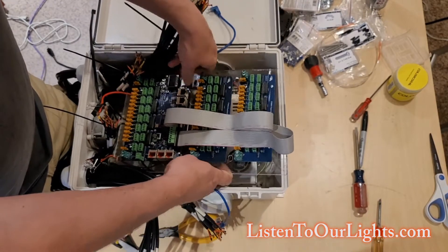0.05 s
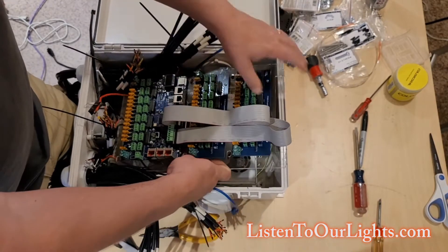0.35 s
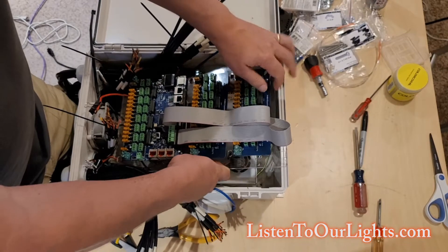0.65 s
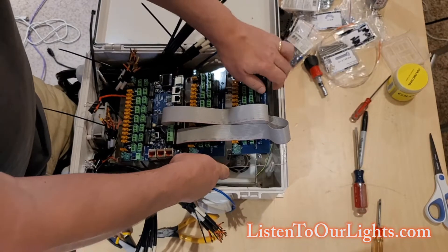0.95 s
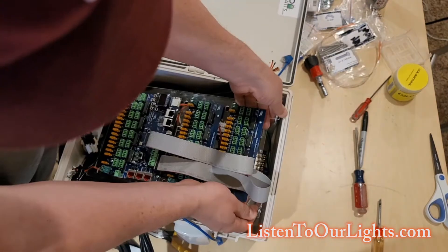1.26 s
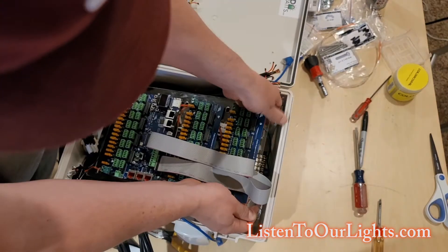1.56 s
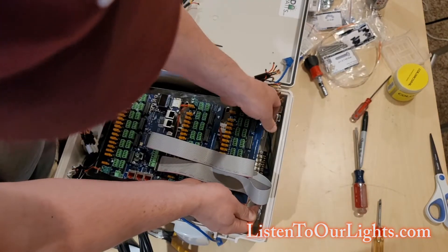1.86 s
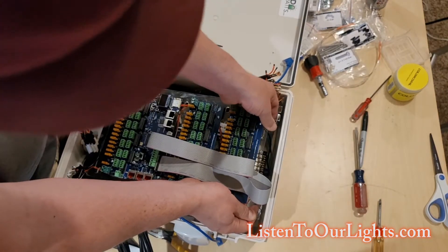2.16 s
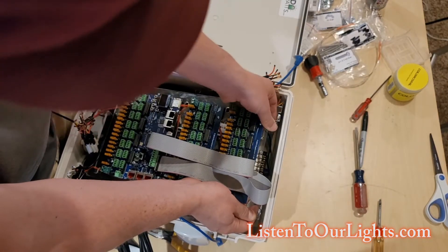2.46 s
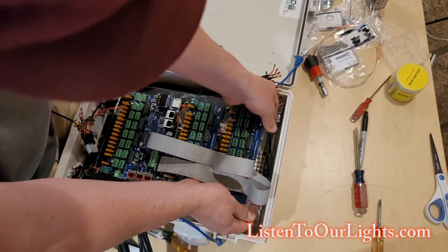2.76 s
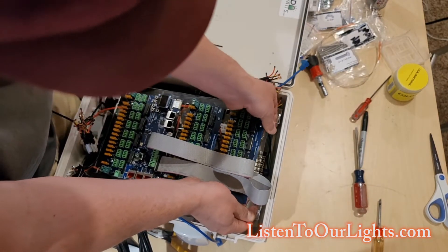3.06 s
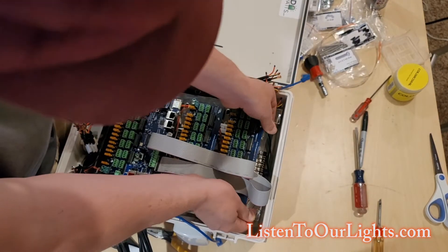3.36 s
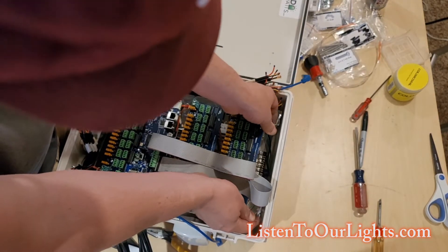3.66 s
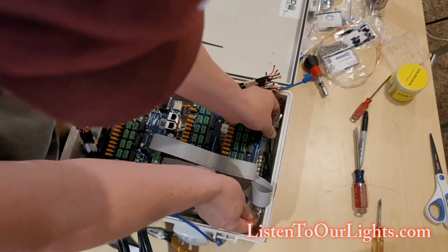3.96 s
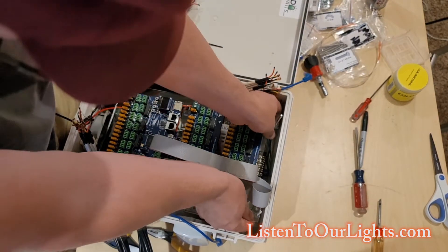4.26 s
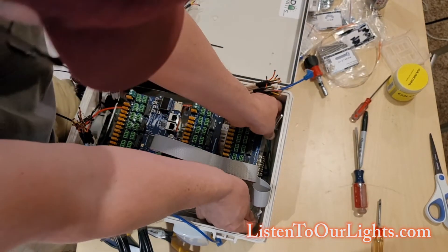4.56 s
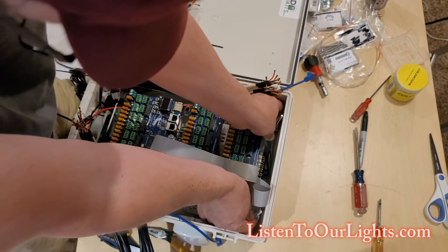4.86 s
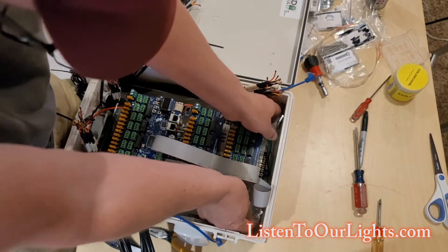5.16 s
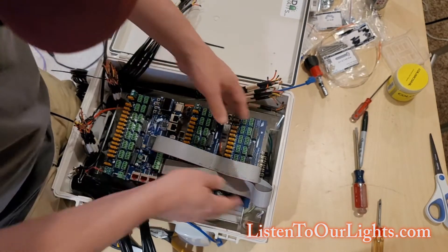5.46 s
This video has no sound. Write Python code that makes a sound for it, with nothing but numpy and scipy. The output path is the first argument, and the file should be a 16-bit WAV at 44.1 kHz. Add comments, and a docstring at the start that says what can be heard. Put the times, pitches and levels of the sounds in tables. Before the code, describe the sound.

Wires rustle softly and fingers tap on a plastic box in a small room. A circuit panel drops onto the rim with a brief rattling clack, followed by a few taps and tiny squeaks. Then it snaps past the rim and judders down the wall in loud, uneven cracks with a gritty scrape, gradually weakening. A knock and light rustling finish, all heard close over a faint low room rumble.

```python
"""Pressing a panel into a plastic box

Hands press a circuit panel into a plastic electronics box on a wooden bench in a small room.
Wires rustle, fingers tap and squeak, and the panel clacks onto the rim. Then it snaps past the rim
and judders down the wall, sticking and slipping, with a gritty scrape between the jerks."""
import sys
import numpy as np
from scipy import signal
from scipy.fft import rfft, irfft
from scipy.io import wavfile
from scipy.ndimage import uniform_filter1d

SR = 44100
rng = np.random.default_rng(int(sys.argv[2]) if len(sys.argv) > 2 else 0)


def generate_wav(signal):
    """Clip the signal to [-1, 1] and save it as 16-bit WAV at the path in sys.argv[1]."""
    frames = np.transpose(np.atleast_2d(signal))
    scaled = np.clip(frames, -1, 1) * 32767
    pcm = np.round(scaled).astype(np.int16)
    wavfile.write(sys.argv[1], SR, pcm)


N = 243411
TIME = np.arange(N) / SR
SHORT, BRIEF = TIME[:SR // 2], TIME[:4096]  # clocks for single sounds [s]
SIDES = np.array([[1], [-1]])  # left, right

# pitches at which the panel rings: (pitch [Hz], width [Hz], boost [dB])
PANEL_PEAKS = [(1110, 60, 5), (1510, 70, 4), (1810, 70, 8), (2130, 80, 3), (2730, 70, 4), (3400, 130, 4)]


def judder(slowing=1.2, growth_db=0.5, uneven_s=.0004, uneven_db=1):
    """Each push makes the panel stick and slip in jerks that come ever further apart."""
    # pushes on the panel: (start [s], first gap [s], jerks [count], crack [dB], thump [dB])
    pushes = [(2.9035, .005, 1, -16, -25), (2.908, .005, 1, -9.5, -22.5), (3.047, .023, 2, -32, -28.5),
              (3.238, .011, 2, -29.5, -28), (3.323, .019, 3, -33.5, -28), (3.38, .005, 1, -5, -17),
              (3.4134, .019, 3, -11.5, -24), (3.4742, .024, 2, -10.5, -22), (3.618, .011, 1, -7.5, -17.5),
              (3.6402, .0145, 3, -14, -24.5), (3.7009, .009, 3, -16.5, -26.5), (3.74, .015, 1, -11, -25.5),
              (3.772, .015, 2, -19, -27), (3.811, .017, 1, -14.5, -23), (3.8461, .017, 1, -13, -19.5),
              (3.9095, .022, 2, -13, -23), (3.973, .015, 1, -13.5, -24.5), (4.027, .0225, 3, -16, -23),
              (4.1758, .029, 2, -18.5, -22.5), (4.234, .018, 3, -18.5, -30), (4.328, .019, 1, -26, -29),
              (4.3645, .025, 2, -23, -27), (4.466, .02, 1, -25, -28), (4.502, .026, 2, -24, -28.5),
              (4.567, .031, 2, -26, -31)]
    jerks = []  # (time [s], crack [dB], thump [dB], scrape [dB])
    for s, gap, count, crack, thump in pushes:
        scrape = (crack + thump) / 2 - 8
        for k in range(round(count)):
            late, harder = rng.standard_normal(2) * [uneven_s, uneven_db]
            jerks.append((s + late * (k > 0), crack + harder, thump + harder + k * growth_db, scrape))
            s += gap * slowing ** k
    return jerks


def panel_slips(jerks, detune=0.0093, left_db=6.5):
    """Each jerk cracks at the edge, makes the panel sing briefly and shoves the box so it rings."""
    # the panel's note as it sinks in: (time [s], pitch [Hz], rise [s], level over the thump [dB])
    note_by_depth = [(2.905, 613, 0.0018, 9.5), (2.909, 375, 0.0036, 4), (2.95, 665, .0032, 6.5),
                     (3.381, 656, 0.0052, -7.5), (3.414, 726, 0.0042, 8), (3.5, 738, .0033, 7),
                     (3.62, 589, 0.0013, -2), (4.25, 448, 0.004, -2.5)]
    # tone of a crack: (frequency [Hz], level [dB])
    crack_tone = [(200, -26), (600, 10), (1000, -3), (1400, -2), (2100, 6), (3100, 1.5), (3700, -2.5),
                  (4700, -1.5), (6300, -8), (7500, -14.5), (11500, -28), (16000, -41)]
    cracks, shoves, notes = np.zeros((2, N)), np.zeros(N), np.zeros((2, N))
    when, *columns = np.transpose(note_by_depth)
    for s, crack_db, thump_db, _ in jerks:
        hz, rise_s, sing_db = (np.interp(s, when, column) for column in columns)
        hz *= np.exp(detune * rng.standard_normal())
        crack = through(tear(rise_s=rng.uniform(.0009, .0016)), colour(crack_tone, PANEL_PEAKS))
        add(cracks, s, from_db(crack_db + 14.5) * through(crack, walls(t60=0.092, scatter_db=2.5)))
        add(shoves, s, from_db(thump_db + 8) * ring(hz, cycles=0.99))
        note = swell(rise_s) * np.sin(2 * np.pi * hz * SHORT + SIDES * 0.5)
        add(notes, s, from_db(thump_db + sing_db) * note)
    return cracks + notes * from_db(SIDES * left_db / 2) + through(shoves, box_ring())


def panel_scrape(jerks, inside_s=3.6):
    """The panel drags over grit, faster after each jerk, and shakes the bench once it is inside."""
    # the drag beneath the jerks: (time [s], level [dB])
    drag = [(3.6, -42), (3.63, -27), (3.76, -29), (4.0, -38), (4.07, -30), (4.13, -50.5), (4.23, -23),
            (4.43, -59), (4.55, -35.5), (4.65, -47), (4.72, -71)]
    # tone of the grit: (frequency [Hz], level [dB])
    grit_tone = [(120, -4), (400, 7.5), (750, -0.5), (1000, -8), (1900, -5), (3200, -10), (5000, -23),
                 (7500, -24.5), (12000, -24), (16000, -34)]
    power = from_db(np.interp(TIME, *np.transpose(drag), left=-np.inf, right=-np.inf)) ** 2
    for s, _, _, scrape_db in jerks:
        add(power, s, (from_db(scrape_db) * swell(rise_s=0.0085)) ** 2)
    catches = np.sqrt(power) * grains(per_s=1700, spread_db=3.2, clump_db=1.5)
    scrape = through(catches, colour(grit_tone, PANEL_PEAKS))
    bench_rumble = from_db(6) * filtered(catches * (TIME > inside_s), [85, 230], "band")
    return through(scrape, walls(t60=0.079, scatter_db=-1)) + bench_rumble


def panel_knock():
    """The panel drops on the rim and rattles to rest: dry clacks over a thud the hands muffle."""
    # hits on the rim: (time [s], clack [dB], thud [dB])
    knocks = [(1.471, -26, -44), (1.474, -21.5, -27), (1.4815, -22, -47), (1.4865, -27.5, -25.5),
              (1.497, -32, -32), (1.545, -41, -44), (1.585, -41, -54)]
    # tone of the clacks: (frequency [Hz], level [dB])
    rim_tone = [(150, -1), (1000, -3.5), (2000, 1.5), (4700, -10), (8000, -22.5), (16000, -34)]
    clacks, thuds = np.zeros((2, N)), np.zeros(N)
    for s, clack_db, thud_db in knocks:
        clack = through(tear(rise_s=.001), walls(t60=0.079, scatter_db=3))
        add(clacks, s, from_db(clack_db + 17) * clack)
        add(thuds, s, from_db(thud_db + 15) * ring(hz=460, cycles=9.5))
    return through(clacks, colour(rim_tone)) + thuds + from_db(-16) * through(thuds, box_ring())


def edge_zings(hz=8520, spread_hz=80, gap_s=.015):
    """Deep in the box the panel's edge catches and sings thinly, never at quite the same pitch."""
    # quick runs of chirps: (start [s], chirps [count], level [dB])
    runs = [(3.622, 5, -44), (3.735, 4, -46), (4.212, 1, -44), (4.278, 2, -45), (4.374, 3, -46),
            (4.477, 5, -46.5), (4.576, 2, -50), (4.648, 1, -52)]
    out = np.zeros((2, N))
    for s, count, db in runs:
        for k in range(round(count)):
            off_pitch, harder, left_lead = rng.standard_normal(3)
            tone = np.sin(2 * np.pi * (hz + spread_hz * off_pitch) * SHORT + SIDES * left_lead / 2)
            add(out, s + k * gap_s, from_db(db + 4 + harder) * swell(rise_s=.0021) * tone)
    return out


def finger_taps(ring_s=0.044):
    """A light touch gives a clack, a tick, a short ring of the part hit and a dull thump of the box."""
    # fingers and wire ends hitting the box: (time [s], tap [dB], pitch [Hz], thump [dB], tick [dB])
    taps = [(.161, -42, 3000, -73, -57), (.178, -26.5, 2430, -48, -49), (.249, -32, 900, -53, -50.5),
            (0.3, -25.5, 1737, -52, -56), (0.4538, -57, 2660, -55, -58.5), (.511, -57, 5500, -62, -62.5),
            (0.656, -53, 1810, -59, -59.5), (.762, -43, 1540, -48, -38.5), (.836, -33, 2610, -56.5, -71),
            (1.15, -55, 7100, -70, -70), (1.892, -47, 760, -54.5, -61), (2.202, -34.5, 940, -50.5, -83),
            (2.616, -39, 1990, -48, -67), (4.812, -29, 1186, -42, -64.5), (4.903, -44.5, 569, -52, -79),
            (5.095, -62.5, 2000, -53, -56), (5.283, -44, 1840, -59, -61), (5.436, -46, 1900, -55, -61)]
    # tone of a clack: (frequency [times the tap's pitch], level [dB])
    clack_tone = [(.15, -13.5), (.5, 2), (1, 10), (1.6, 1), (3.3, -20), (8, -48.5)]
    # tone of a tick: (frequency [Hz], level [dB])
    tick_tone = [(400, 6), (1000, 2.5), (1550, 9), (2250, 10), (3150, 5.5), (4600, -2), (6500, -4),
                 (8500, -11.5), (11500, -8), (16000, -32)]
    bright, shoves = np.zeros((2, N)), np.zeros(N)
    for s, tap_db, hz, thump_db, tick_db in taps:
        snap = unit_energy(spray(t60=0.055)[0] + 0.47 * (BRIEF == 0))  # a click, then dying noise
        contact = through(snap, walls(t60=0.033, scatter_db=0.5))
        clack = through(contact, colour([(hz * multiple, db) for multiple, db in clack_tone]))
        add(bright, s, from_db(tap_db + 17) * clack)
        add(bright, s, from_db(tick_db + 28) * through(contact, colour(tick_tone)))
        add(bright, s, from_db(tap_db + 6.5) * ring(hz, cycles=hz * ring_s))
        add(shoves, s, from_db(thump_db + 12.5) * ring(hz=465, cycles=3.5))
    return bright + through(shoves, box_ring())


def squeaks(sag=0.11, sag_s=0.014, left_db=8):
    """A finger or the panel creeps over plastic and squeaks, its pitch sagging as the strain lets go."""
    # brief rubs: (time [s], pitch it sags to [Hz], rise [s], level [dB])
    rubs = [(.482, 414, 0.018, -40), (2.162, 477, 0.0023, -41.5), (2.687, 613, 0.0038, -35.5),
            (2.854, 706, 0.0056, -40), (5.268, 567, 0.0084, -42)]
    out = np.zeros(N)
    for s, hz, rise_s, db in rubs:
        pitch = hz * (1 + sag * np.exp(-SHORT / sag_s))
        tone = np.sin(2 * np.pi * np.cumsum(pitch) / SR)
        rasp = rms_one(filtered(rng.standard_normal(len(SHORT)), [400, 2200], "band"))
        add(out, s, from_db(db) * swell(rise_s) * (tone + from_db(-25) * rasp))
    return out * from_db(SIDES * left_db / 2)


def wire_rustle():
    """Skin and wires slide over plastic: a dull grainy rub that stirs the box, under a fine hiss."""
    # strokes of hands and wires: (start [s], rise [s], rub [dB], hiss [dB])
    strokes = [(0, 0.047, -52, -65), (0.154, 0.013, -50, -57), (0.248, 0.011, -41.5, -62),
               (0.449, 0.029, -53.5, -57), (0.647, 0.013, -48.5, -52.5), (.72, 0.019, -52, -53.5),
               (1.08, 0.069, -57.5, -69.5), (2.326, 0.023, -51, -66), (4.661, 0.032, -55, -84),
               (5.098, 0.064, -52, -60), (5.189, 0.043, -54, -57), (5.27, 0.036, -61, -61)]
    # tones of the rub and the hiss: (frequency [Hz], level [dB])
    rub_tone = [(150, -16), (300, 1.5), (440, 10), (700, 4), (1100, -10.5), (2200, -10.5), (4000, -26.5),
                (8000, -51)]
    hiss_tone = [(1500, 12.5), (4000, 6), (7000, -0.5), (11000, -9.5), (16000, -31)]
    start, rise, rub_db, hiss_db = np.transpose(strokes)
    progress = np.maximum(TIME[:, None] - start, 0) / rise
    speed = progress * np.exp(1 - progress)  # each stroke sets off briskly and slows to a stop
    rub = speed @ from_db(rub_db) * grains(per_s=1800, spread_db=2, clump_db=2)
    hiss = speed @ from_db(hiss_db) * grains(per_s=1100, spread_db=5, clump_db=3)
    rustle = through(rub, colour(rub_tone)) + through(hiss, colour(hiss_tone))
    scattered = through(rustle, walls(t60=0.013, scatter_db=0.5)) * from_db(SIDES * 0.76)
    return scattered + from_db(-13) * through(rub, box_ring())


def box_ring(left_lead_rad=0.27):
    """A shove sets the box and bench ringing with several low notes, a little early on the left."""
    # notes of the box and bench: (pitch [Hz], level [dB], fade time [s], left over right [dB])
    box_notes = [(130, -24, .29, -3), (180.4, -19.5, 0.51, 0.5), (211.4, -20, 0.42, 1.5),
                 (352.6, -2, .1, -7.5), (416.3, 1, 0.12, 5), (481, -2.5, 0.078, 3), (632.5, -7.5, .14, 9.5),
                 (719, -5.5, 0.25, 12), (755.7, -6.5, .13, 14)]
    out = 0
    for hz, db, t60, left_db in box_notes:
        tone = np.cos(2 * np.pi * hz * SHORT + SIDES * left_lead_rad / 2)
        out += from_db(db + SIDES * left_db / 2) * tone * fade(t60)
    return out / np.sqrt(SR / 100)


def walls(t60, scatter_db):
    """The direct sound, a sample earlier on the left, plus the short ring of the plastic walls."""
    direct = np.array([BRIEF == 0, BRIEF == BRIEF[1]])
    scatter = filtered(spray(t60, channels=2), 280, "high")
    return unit_energy(direct + from_db(scatter_db) * scatter)


def room(x, echo_db, build_s):
    """Add the room's wash of echoes, which builds up quickly and lasts longest in the bass."""
    # how long the room rings: (frequency [Hz], fade time [s])
    fade_times = [(150, 0.94), (400, 0.33), (1000, 0.24), (3000, 0.3), (7000, 0.33), (14000, 0.16)]
    edges = np.geomspace(60, 16000, 9)
    build_up = 1 - np.exp(-(SHORT / build_s) ** 2)
    tail = 0
    for low, high in zip(edges, edges[1:]):
        band = filtered(rng.standard_normal((2, len(SHORT))), [low, high], "band")
        band *= fade(at_hz(fade_times, np.sqrt(low * high))) * build_up
        if high < 250:
            band = band[[0, 0]]  # long waves reach both ears alike
        tail += unit_energy(band) * np.sqrt(2 * (high - low) / SR)
    return x + from_db(echo_db) * through(x, tail)


def room_air(level_db=-55):
    """The room's steady low rumble, alike in both ears in the bass."""
    # tone of the air: (frequency [Hz], level [dB])
    air_tone = [(20, -13), (65, 2.5), (172, -10.5), (434, -17.5), (738, -20.5), (1050, -26.5), (2460, -31),
                (3250, -33), (8650, -51), (11400, -50.5), (16000, -58.5)]
    # how alike left and right are: (frequency [Hz], likeness [0 to 1])
    likeness = [(140, .98), (300, .75), (1000, .3)]
    hz = np.fft.rfftfreq(N, 1 / SR)
    common, opposite = rfft(rng.standard_normal((2, N)))
    alike = at_hz(likeness, hz)
    spectrum = np.sqrt(1 + alike) * common + SIDES * np.sqrt(1 - alike) * opposite
    air = irfft(from_db(at_hz(air_tone, hz)) * spectrum, N)
    return from_db(level_db) * rms_one(filtered(air, 7000, "low", order=1))


def tear(rise_s):
    """Tiny contacts give way, building up to one sharp break, then die out."""
    burst = unit_energy(spray(t60=.06)[0] * swell(rise_s)[:len(BRIEF)])
    sharp_break = np.arange(len(BRIEF)) == round(rise_s * SR)
    return unit_energy(burst + .7 * sharp_break)


def grains(per_s, spread_db, clump_db):
    """Sliding surfaces catch at random: tiny clicks of uneven size, louder in clumps."""
    clumps = rms_one(uniform_filter1d(rng.standard_normal(N), size=700))
    sizes = from_db(spread_db * np.minimum(rng.exponential(1, N), 4) + clump_db * clumps)
    return rms_one((rng.random(N) < per_s / SR) * sizes * rng.choice([-1, 1], N))


def spray(t60, channels=1):
    """Dying noise, evened out so that no pitch stands out."""
    noise = rng.standard_normal((channels, len(BRIEF))) * fade(t60)[:len(BRIEF)]
    for _ in range(2):
        spectrum = rfft(noise)
        noise = irfft(spectrum / (np.abs(spectrum) + 1e-12)) * fade(t60 * 4)[:len(BRIEF)]
    return unit_energy(noise)


def ring(hz, cycles):
    """A pure tone that dies within so many cycles."""
    return unit_energy(np.sin(2 * np.pi * hz * SHORT) * fade(cycles / hz))


def swell(rise_s):
    """A push that peaks after rise_s and is then stopped by friction."""
    progress = SHORT / rise_s
    return progress * np.exp(1 - progress)


def fade(t60):
    """A fade that drops 60 dB in t60 seconds."""
    return from_db(-60 * SHORT / t60)


def colour(points, peaks=(), size=4096):
    """A filter's response to a click, built from a tone table and any ringing peaks."""
    hz = np.fft.rfftfreq(size, 1 / SR)
    boost_db = sum(top / (1 + (2 * (hz - f) / width) ** 2) for f, width, top in peaks)
    cepstrum = irfft(np.log(from_db(at_hz(points, hz) + boost_db)))
    lag = np.arange(size)
    one_sided = (1 + np.sign(size // 2 - lag)) * (lag > 0)  # so nothing sounds before the click
    return unit_energy(irfft(np.exp(rfft(cepstrum * one_sided))))


def through(x, response):
    """Pass a sound through something, given its response to a click."""
    return signal.fftconvolve(np.atleast_2d(x), np.atleast_2d(response), axes=-1)[:, :N]


def filtered(x, hz, keep, order=2):
    """Keep the low part, the high part or one band of a sound."""
    return signal.sosfilt(signal.butter(order, hz, keep, fs=SR, output="sos"), x)


def add(track, s, sound):
    """Mix a sound in at s seconds."""
    i = round(s * SR)
    track[..., i:i + sound.shape[-1]] += sound[..., :N - i]


def at_hz(points, hz):
    """Read between a table's rows, with octaves evenly spaced."""
    f, value = np.transpose(points)
    return np.interp(np.log(np.maximum(hz, 1)), np.log(f), value)


def from_db(db):
    """Turn decibels into a multiplier."""
    return 10 ** (np.asarray(db) / 20)


def unit_energy(x):
    """Scale each channel to an energy of one."""
    return x / np.sqrt(np.sum(x ** 2, axis=-1, keepdims=True) + 1e-20)


def rms_one(x):
    """Scale to an average power of one."""
    return x / np.sqrt(np.mean(x ** 2) + 1e-20)


def scene():
    """Panel and hands echo in the room, over its steady rumble."""
    jerks = judder()
    panel = panel_knock() + panel_slips(jerks) + panel_scrape(jerks) + edge_zings()
    panel = room(panel, echo_db=-7, build_s=0.0044)
    hands = room(finger_taps() + squeaks() + wire_rustle(), echo_db=-4, build_s=0.0025)
    return panel + hands + room_air()


def record(dry):
    """The microphones lose the deepest bass, and the highest treble is cut steeply."""
    treble_cut = signal.ellip(10, .1, 80, 15950, fs=SR, output="sos")
    return signal.sosfilt(treble_cut, filtered(dry, 48, "high"))


dry = scene()
out = record(dry)
generate_wav(out)
```